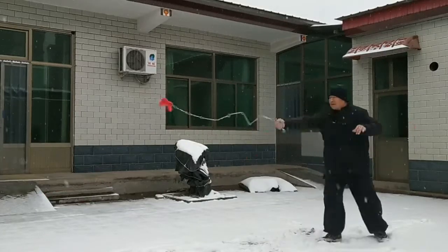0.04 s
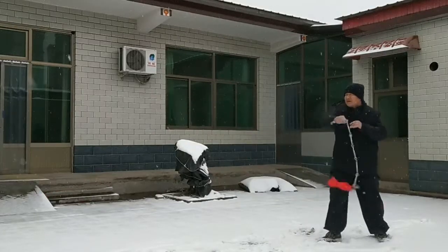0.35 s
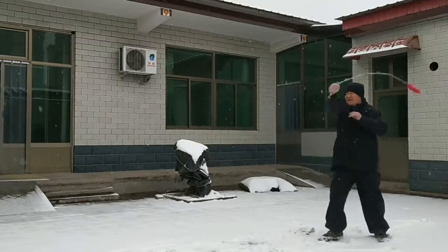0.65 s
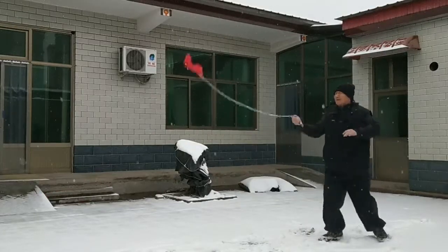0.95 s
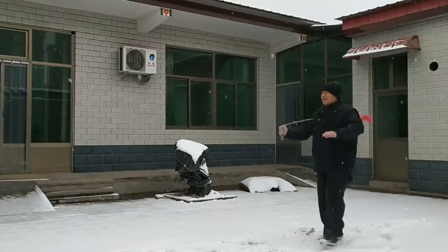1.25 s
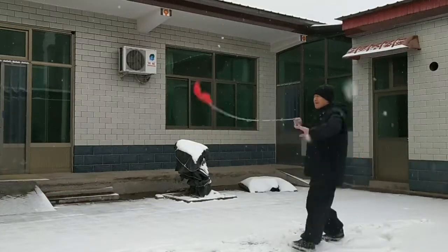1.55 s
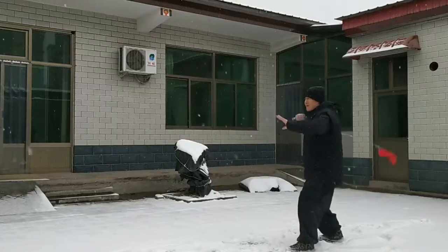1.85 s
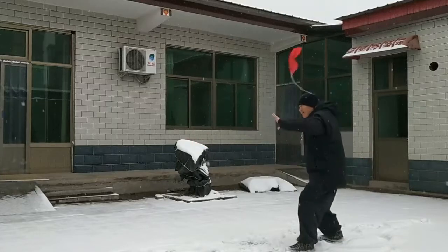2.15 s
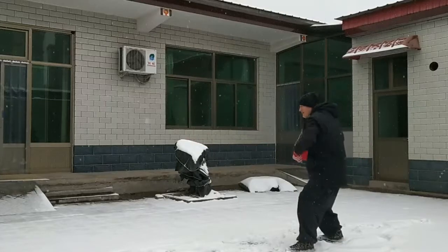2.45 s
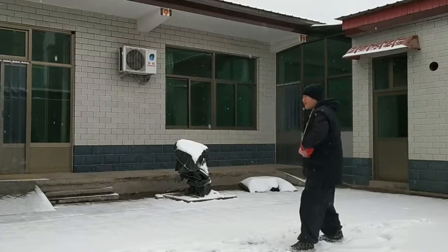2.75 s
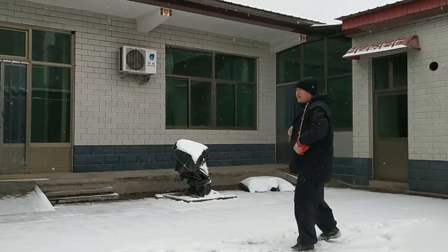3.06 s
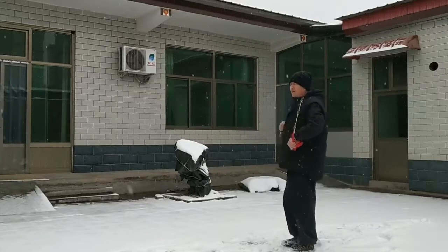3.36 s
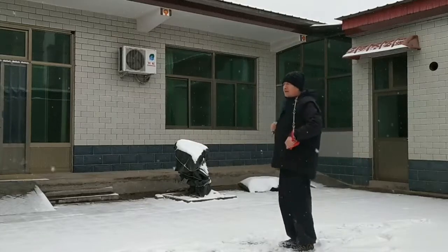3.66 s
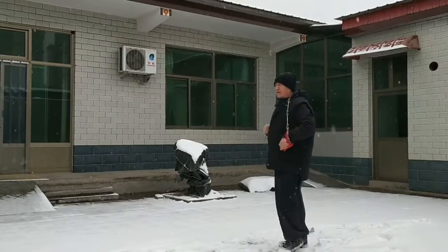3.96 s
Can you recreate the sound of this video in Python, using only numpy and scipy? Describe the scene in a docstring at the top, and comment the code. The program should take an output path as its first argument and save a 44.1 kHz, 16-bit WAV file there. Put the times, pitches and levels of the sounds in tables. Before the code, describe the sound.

A steel chain whip rattles from the start, loudest in the first second, its joints clicking and ringing with a short courtyard echo. Its cloth tip flutters and swishes, and feet thud softly in snow. Around 2 seconds it brushes a coat and is caught, falling silent by 2.4. A low outdoor hush remains, with faint shuffling, a shoe sliding at 3.4 and a clearer step near 3.8.

```python
"""A steel chain whip swings in circles in a hushed, snowy courtyard. From the start its joints click
densely, its rods ring and the cloth flag at the tip flutters and swishes; the walls give the steel
a short echo. The whip brushes the coat and feet thud in the snow as the swings go on. About two
seconds in, it wraps round the body and is caught. The dark outdoor hush and a faint, thin electronic
hiss remain, with soft shuffling feet, a sliding shoe and one last clear step."""
import sys
import numpy as np
from scipy import signal
from scipy.fft import rfft, irfft
from scipy.io import wavfile

SR = 44100
rng = np.random.default_rng(int(sys.argv[2]) if len(sys.argv) > 2 else 0)


def waveform_to_disk(signal):
    """Save audio, clipped to [-1, 1], as 16-bit WAV at the path in sys.argv[1]."""
    frames = np.transpose(np.atleast_2d(signal))
    scaled = np.clip(frames, -1, 1) * 32767
    samples = np.round(scaled).astype(np.int16)
    wavfile.write(sys.argv[1], SR, samples)


N = 176400

# rattle envelope of the joints, one list per swing (time [s], level [dB])
SWING_LEVELS = [
    [(0, -38.5), (.07, -50), (.12, -46.5), (.126, -36.5), (.172, -36), (.225, -38), (.265, -41),
     (.41, -44.5), (.45, -48), (.59, -48), (.66, -55.5)],
    [(.7, -47.5), (.74, -45.5), (.91, -47.5), (.955, -46), (.995, -39.5), (1.05, -50), (1.13, -46),
     (1.2, -49.5), (1.24, -46.5), (1.35, -55.5), (1.422, -55)],
    [(1.432, -48.5), (1.48, -48.5), (1.56, -54), (1.605, -46), (1.67, -58), (1.73, -60.5), (1.775, -53.5),
     (1.85, -73)],
    [(1.866, -59.5), (1.945, -57), (2.025, -45.5), (2.11, -62.5), (2.18, -62), (2.24, -58.5), (2.3, -69),
     (2.34, -79), (2.46, -84)],
]
# how slack the chain hangs (time [s], slack [0-1])
CHAIN_SLACK = [(0, 0.87), (.12, 1), (.22, 0.93), (.3, 0.15), (.45, 0.05), (1.85, 0), (2.02, 0.9)]
# tone of the clicks in the taut chain (frequency [Hz], level [dB])
TAUT_COLOUR = [(900, -26.5), (2500, -13.5), (3250, -3.5), (3850, -13), (4400, -8.5), (5800, -4),
               (7100, 3.5), (7700, -7.5), (8700, -18), (9400, -5), (10500, -20.5), (12900, -15),
               (13900, -4), (15400, -8)]
# tone of the clicks in the slack chain (frequency [Hz], level [dB])
SLACK_COLOUR = [(900, -25), (3700, -15.5), (4600, -5), (5100, 1.5), (7000, -2.5), (8300, -14),
                (10900, -7.5), (12600, -17.5), (14300, -9.5), (15400, -7.5)]
# single hard clicks of a joint (time [s], level [dB])
JOINT_CLACKS = [(0.125, -15), (0.2611, -24), (0.47, -21.5), (0.7243, -24), (0.761, -24.5), (0.9747, -26),
                (0.981, -21), (1.448, -30), (1.591, -28), (1.864, -30.5), (2.194, -30.5), (2.27, -37)]
# modes of slack links knocking together (frequency [Hz], level [dB])
KNOCK_MODES = [(4930, -0.5), (5013, 6.5), (5132, -4.5), (5340, -1), (6163, -3), (10070, -4), (11051, -10.5)]
# air on the flag and the chain (time [s], flutter level [dB], swish level [dB])
AIR_LEVELS = [(0, -61, -55.5), (.1, -66.5, -59), (.24, -58, -57), (.45, -65.5, -64.5), (.58, -60, -61.5),
              (.68, -61.5, -67.5), (.85, -62.5, -59), (1.36, -63.5, -68.5), (1.54, -59.5, -63),
              (1.78, -64, -66.5), (1.96, -62, -65.5), (2.02, -57.5, -70), (2.12, -66, -64.5),
              (2.3, -63, -64), (2.41, -65, -72.5), (2.43, -81, -80)]
# low flutter of the cloth (frequency [Hz], level [dB])
FLUTTER_COLOUR = [(30, -22), (50, -1), (100, 3.5), (180, -3.5), (380, -5.5), (465, -4.5), (560, -6.5),
                  (900, -10), (1600, -28.5), (4000, -41.5)]
# bright swish of the air (frequency [Hz], level [dB])
SWISH_COLOUR = [(400, -13.5), (900, -4.5), (1600, 1.5), (3200, -4), (6000, -3), (15000, -36)]
# dark outdoor hush, plus a faint thin electronic hiss near 15 kHz (frequency [Hz], level [dB])
BED_COLOUR = [(30, -15), (55, -5), (90, -2.5), (210, -10), (820, -17), (1200, -21), (3000, -27.5),
              (6700, -33), (9500, -42), (14400, -40), (15100, -28)]
# envelope of the hush and hiss (time [s], level [dB])
BED_LEVEL = [(0, -67.5), (3.6, -69), (4, -65.5)]
# modes of each steel rod, by name (frequency [Hz], level [dB])
ROD_MODES = {"a": [(1620, -21), (5028, -14.5), (9900, -7.5), (14520, 3)], "b": [(4230, -4.5), (9190, 1.5),
             (13690, -6)], "c": [(2130, -13.5), (4480, -6.5), (9560, -2), (14170, 5.5)], "d": [(5130, -4.5),
             (10780, -6), (14740, 5)], "e": [(6970, -20), (9340, -4), (13480, -2)], "f": [(3180, -8),
             (6650, -12), (13950, -5)], "g": [(1900, -12), (4380, 0.5)], "h": [(5340, -5), (10100, -5),
             (11050, 3)], "i": [(10110, 0.5)]}
# clear strikes on a rod (time [s], rod [name], level [dB])
ROD_STRIKES = [(.001, "d", -41), (.008, "b", -44), (.08, "i", -49), (.147, "h", -44), (0.171, "c", -41),
               (.292, "c", -43.5), (.49, "d", -51), (0.512, "c", -47), (.62, "c", -54), (0.764, "f", -45.5),
               (.87, "c", -51), (.9, "g", -47.5), (1.097, "d", -48), (1.453, "b", -49), (1.572, "a", -43),
               (1.68, "d", -67), (1.743, "e", -54.5), (1.91, "b", -52.5), (1.957, "e", -48),
               (1.994, "a", -51), (2.02, "b", -47), (2.192, "a", -43.5), (2.193, "e", -51)]
# envelope of the rods' shimmer (time [s], level [dB])
SHIMMER_LEVEL = [(0, -61), (.1, -62), (.18, -54), (.45, -56), (.78, -49.5), (1.0, -56), (1.25, -60),
                 (1.38, -67), (1.6, -52.5), (1.83, -82), (2.0, -47), (2.2, -79), (2.45, -88)]
# bright clinks of one connecting ring (time [s], pitch [Hz], level [dB])
RING_CLINKS = [(.166, 5510, -29), (0.2597, 6820, -28.5), (.675, 5700, -42), (0.723, 5666, -37),
               (1.131, 2970, -42.5), (1.28, 5900, -51), (1.303, 5800, -35), (2.303, 5400, -50)]
# the whip brushing the coat, later shuffling feet and the last step (time [s], level [dB], decay [s])
RUSTLES = [(0.127, -43, 0.0063), (0.231, -46, 0.011), (0.846, -47, 0.011), (1.992, -50.5, 0.062),
           (3.3, -76, 0.021), (3.51, -78, .04), (3.831, -68, 0.014)]
# tone of those rustles (frequency [Hz], level [dB])
RUSTLE_COLOUR = [(80, -4.5), (200, -7.5), (480, 7), (1000, -7.5), (1620, 1), (3000, -0.5), (7000, -1.5),
                 (15000, -22)]
# footfalls in the snow (time [s], level [dB], crunch length [s], thud pitch [Hz])
FOOTFALLS = [(.23, -52, 0.026, 171), (0.602, -55, 0.049, 134), (0.827, -53.5, 0.05, 111),
             (0.947, -54.5, 0.02, 72), (1.378, -52, 0.03, 187), (1.995, -63, 0.024, 94),
             (2.912, -64, 0.0098, 111), (3.3, -63, 0.024, 97), (3.823, -53, 0.041, 108)]
# crunch of packed snow (frequency [Hz], level [dB])
SNOW_COLOUR = [(35, -24), (105, -1.5), (230, -5.5), (400, -13), (1000, -19.5), (6000, -40), (12000, -62.5)]
# a shoe slides before the last step (time [s], level [dB], length [s])
SHOE_SLIDE = (3.4, -72, 0.17)
# scuff of that shoe (frequency [Hz], level [dB])
SCUFF_COLOUR = [(250, -17), (490, 8.5), (700, -22), (2200, -8), (7000, -40)]

RATTLE_DB, CLICKS_PER_S, CONTACT_SPREAD_DB = -1.5, 1500, -2
JOINT_T60_S, JOINT_RING_DB = 0.043, -3.5
KNOCK_DB, KNOCK_T60_S = -10.5, 0.11
FLUTTER_DB, SWISH_DB, FLAP_DEPTH_DB, FLAP_HZ = 1, 0.75, 1.5, 69.6
ROD_T60_S, ROD_LONG_T60_S, ROD_LONG_DB, ROD_SPLIT_HZ, ROD_RISE_S = 0.18, 0.31, -6, 24, 0.0009
TAPPED_RODS, TAP_DB, TAP_T60_S, TAP_DETUNE, TAP_SPREAD_DB = "abcef", -3.5, 0.077, 0.0204, 7
YARD_T60_S, YARD_DB, YARD_PREDELAY_S = 0.16, -10.5, 0.0084
THUD_T60_S, THUD_RISE_S, THUD_DB, CRUNCH_DB = 0.16, 0.004, 0.5, -3.5
THUD_OVERTONE_RATIO, THUD_OVERTONE_DB = 1.7, -4


def undb(db):
    """Decibels to gain."""
    return 10 ** (np.asarray(db) / 20)


def curve(rows, column=1):
    """One column of a table, joined by straight lines in time."""
    rows = np.array(rows)
    return np.interp(np.arange(N) / SR, rows[:, 0], rows[:, column])


def norm(x):
    """Scale to energy 1."""
    return x / np.sqrt(np.sum(x ** 2) + 1e-30)


def through(x, response):
    """Pass a sound through an impulse response."""
    return signal.fftconvolve(x, response)[:N]


def colour(points, size=4096):
    """An EQ curve as a minimum-phase impulse response of energy 1."""
    hz, db = np.array(points).T
    bins_hz = np.maximum(np.arange(size // 2 + 1) * SR / size, 1)
    gain = undb(np.interp(np.log(bins_hz), np.log(hz), db))
    cepstrum = irfft(np.log(gain))
    cepstrum[1:size // 2] *= 2
    cepstrum[size // 2 + 1:] = 0
    return norm(irfft(np.exp(rfft(cepstrum))))


def noise(points):
    """Coloured noise of rms about 1."""
    return through(rng.standard_normal(N), colour(points))


def ring(modes, t60):
    """Decaying partials of a struck object (frequency [Hz], level [dB])."""
    t = np.arange(int(t60 * SR) + 2) / SR
    partials = sum(undb(db) * np.sin(2 * np.pi * hz * t + rng.uniform(0, 2 * np.pi)) for hz, db in modes)
    return partials * np.exp(-np.log(1000) * t / t60)


def soften(x, rise):
    """Round off the attack of a sound."""
    return x * (1 - np.exp(-np.arange(len(x)) / SR / rise))


def contacts(per_s):
    """Random impacts of uneven strength, rms 1."""
    hits = rng.random(N) < per_s / SR
    softness = np.minimum(rng.exponential(size=N), 2.6)
    impacts = hits * undb(CONTACT_SPREAD_DB * softness) * rng.choice([-1, 1], N)
    return norm(impacts) * np.sqrt(N)


def add(out, start, x):
    """Mix a sound in at a given time."""
    i = max(int(start * SR), 0)
    out[i:i + len(x)] += x[:N - i]


def joint_click(count=16):
    """One small connecting ring: a sharp tick and short modes scattered across the treble."""
    modes_hz = 1300 + 14200 * (np.arange(count) + rng.random(count)) / count
    click = undb(JOINT_RING_DB) * norm(ring([(hz, 0) for hz in modes_hz], JOINT_T60_S))
    click[0] += 1  # the tick
    return norm(click)


def chain_rattle(joints=14):
    """The joints click as the chain turns; when slack, the links also knock together."""
    levels = [row for swing in SWING_LEVELS for row in swing]
    effort = undb(curve(levels) + RATTLE_DB) * (np.arange(N) / SR < levels[-1][0])
    slack = np.clip(curve(CHAIN_SLACK), 0, 1)
    rate = CLICKS_PER_S / joints
    clicks = sum(through(effort * contacts(rate), joint_click()) for _ in range(joints))
    clicks /= np.sqrt(joints)
    for start, db in JOINT_CLACKS:
        add(clicks, start, undb(db) * joint_click())
    knocks = np.zeros(N)
    for hz, db in KNOCK_MODES:
        hits = effort * slack * contacts(rate)
        knocks += through(hits, undb(db) * norm(ring([(hz, 0)], KNOCK_T60_S)))
    taut = through(clicks * np.sqrt(1 - slack), colour(TAUT_COLOUR))
    loose = through(clicks * np.sqrt(slack), colour(SLACK_COLOUR))
    return taut + loose + undb(KNOCK_DB) * knocks / np.sqrt(len(KNOCK_MODES))


def flag():
    """The cloth flaps unevenly in the air stream until it is caught."""
    t = np.arange(N) / SR
    flaps = undb(FLAP_DEPTH_DB * np.interp(t * FLAP_HZ, np.arange(N), rng.standard_normal(N)))
    flutter = undb(curve(AIR_LEVELS) + FLUTTER_DB) * noise(FLUTTER_COLOUR)
    swish = undb(curve(AIR_LEVELS, column=2) + SWISH_DB) * noise(SWISH_COLOUR)
    return (flutter + swish) * flaps * (t < AIR_LEVELS[-1][0])


def hush_and_hiss():
    """Dark outdoor hush, plus a faint thin electronic hiss near 15 kHz."""
    return undb(curve(BED_LEVEL)) * noise(BED_COLOUR)


def rod_ping(name, t60, long_t60, tuning=1):
    """A rod bends in two planes, so modes come in close pairs: the joint damps one, the other is free."""
    planes = [[(hz * tuning + ROD_SPLIT_HZ * rng.standard_normal(), db) for hz, db in ROD_MODES[name]]
              for _ in range(2)]
    damped = ring(planes[0], t60)
    free = undb(ROD_LONG_DB) * ring(planes[1], long_t60)
    damped = np.pad(damped, (0, len(free) - len(damped)))
    return soften((damped + free) / np.sqrt(2), ROD_RISE_S)


def ringing_steel(taps=800):
    """Hard strikes ring the rods, connecting rings clink, and light taps keep up a shimmer."""
    out = np.zeros(N)
    for start, name, db in ROD_STRIKES:
        add(out, start, undb(db) * rod_ping(name, ROD_T60_S, ROD_LONG_T60_S))
    for start, hz, db in RING_CLINKS:
        add(out, start, undb(db) * ring([(hz, 0)], t60=0.024))
    times, levels = np.array(SHIMMER_LEVEL).T
    for k, (jitter, pick, pull, force) in enumerate(rng.random((taps, 4))):
        start = (k + jitter) / taps * times[-1]
        db = np.interp(start, times, levels) + TAP_DB + TAP_SPREAD_DB * (2 * force - 1)
        name = TAPPED_RODS[int(pick * len(TAPPED_RODS))]
        tuning = 1 + TAP_DETUNE * (2 * pull - 1)  # a random pull on the chain detunes each tap
        add(out, start, undb(db) * rod_ping(name, TAP_T60_S, TAP_T60_S, tuning))
    return out


def yard_echo(x):
    """The courtyard walls add a short, diffuse echo to a sound."""
    t = np.arange(SR) / SR
    tail = rng.standard_normal(SR) * np.exp(-np.log(1000) * t / YARD_T60_S) * (t > YARD_PREDELAY_S)
    return x + undb(YARD_DB) * through(x, norm(tail))


def rustles():
    """Short rustles: the whip brushing the coat, later shuffling feet and the last step."""
    t, out = np.arange(N) / SR, np.zeros(N)
    for start, db, decay in RUSTLES:
        add(out, start, undb(db) * np.exp(-t / decay) * noise(RUSTLE_COLOUR))
    return out


def foot_load(start, db, length):
    """The rounded rise and fall of a foot's weight on the snow."""
    progress = np.clip((np.arange(N) / SR - start) / length, 0, 1)
    return undb(db) * 2 * np.sqrt(progress * (1 - progress))


def footsteps():
    """Each foot lands with a dull thud and packs the snow with a grainy crunch."""
    load = sum(foot_load(start, db, length) for start, db, length, _ in FOOTFALLS)
    out = undb(CRUNCH_DB) * through(load * contacts(per_s=2500), colour(SNOW_COLOUR))
    for start, db, _, hz in FOOTFALLS:
        thud = ring([(hz, 0), (hz * THUD_OVERTONE_RATIO, THUD_OVERTONE_DB)], THUD_T60_S)
        add(out, start, undb(db + THUD_DB) * soften(thud, THUD_RISE_S))
    return out


def shoe_slide():
    """A shoe scuffs softly through the snow."""
    return foot_load(*SHOE_SLIDE) * noise(SCUFF_COLOUR)


def scene():
    """Mono mix: steel and rustles with echo, the rest dry."""
    echoed = yard_echo(chain_rattle() + ringing_steel() + rustles())
    return (echoed + flag() + footsteps() + shoe_slide() + hush_and_hiss())[None]


def record(dry):
    """The microphone drops the deepest bass and the very top."""
    low_cut = signal.butter(4, 42, "high", fs=SR, output="sos")
    high_cut = signal.ellip(12, .2, 80, 15430, fs=SR, output="sos")
    return signal.sosfilt(high_cut, signal.sosfilt(low_cut, dry))


dry = scene()
out = record(dry)
waveform_to_disk(out)
```